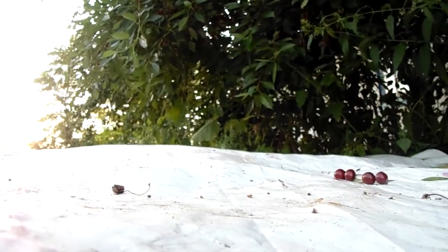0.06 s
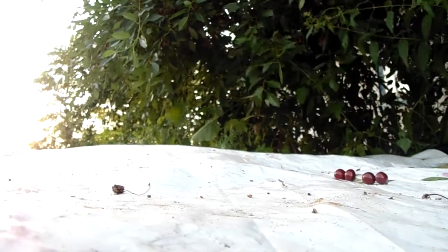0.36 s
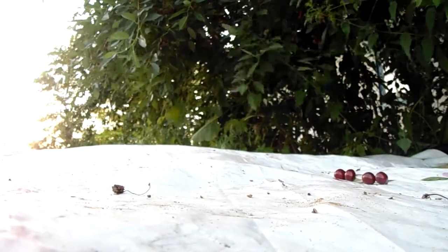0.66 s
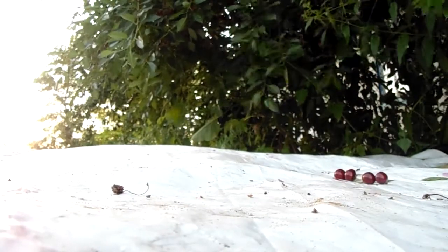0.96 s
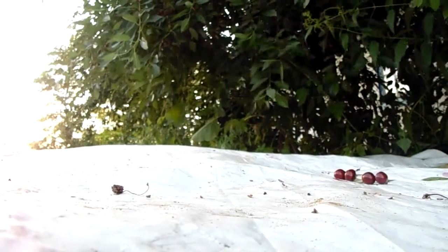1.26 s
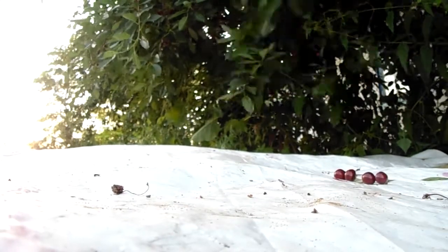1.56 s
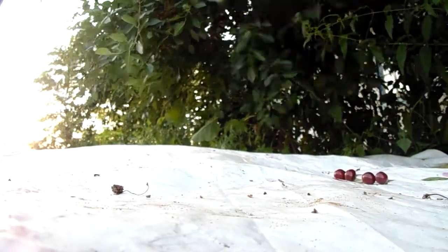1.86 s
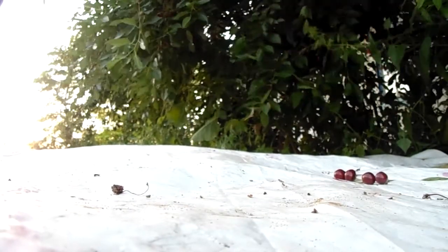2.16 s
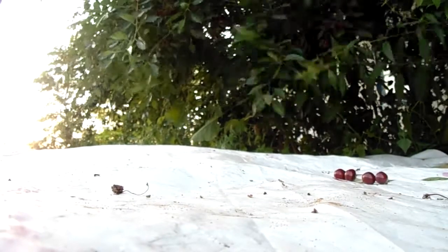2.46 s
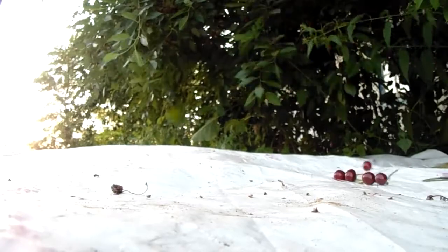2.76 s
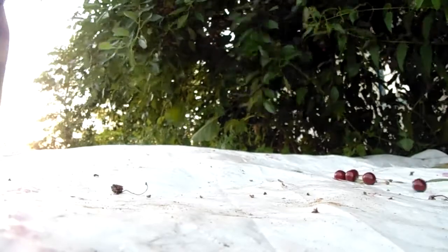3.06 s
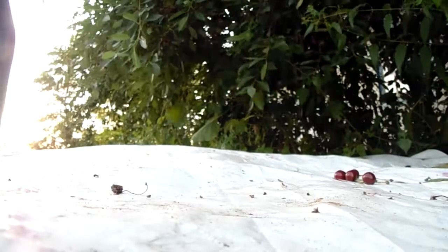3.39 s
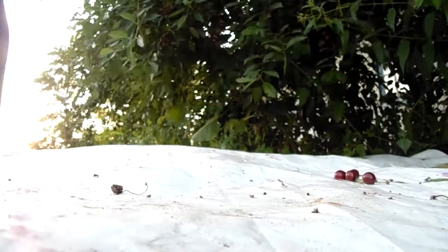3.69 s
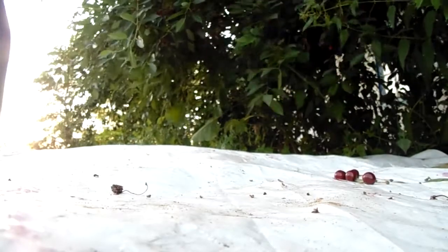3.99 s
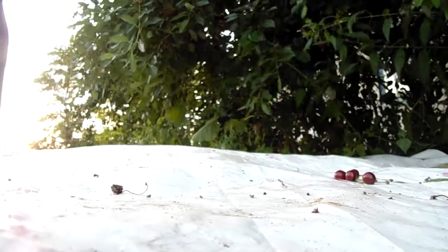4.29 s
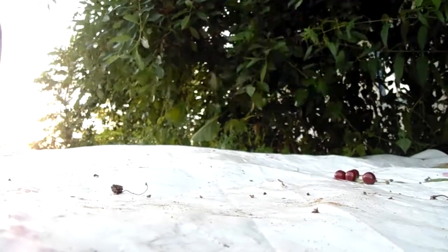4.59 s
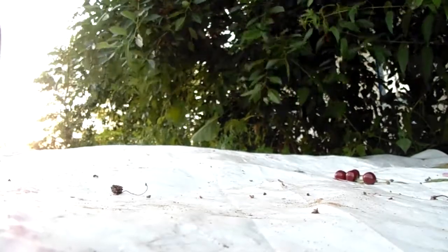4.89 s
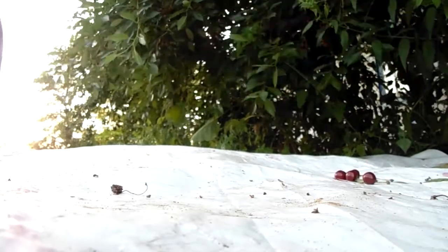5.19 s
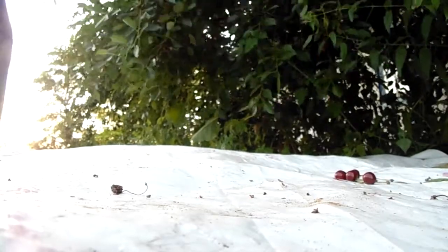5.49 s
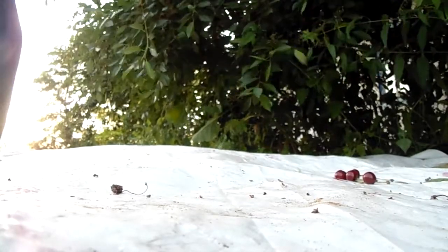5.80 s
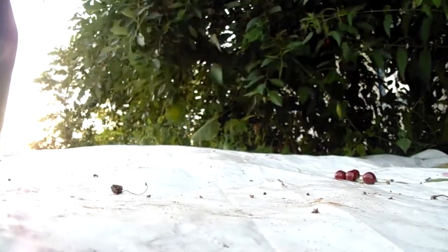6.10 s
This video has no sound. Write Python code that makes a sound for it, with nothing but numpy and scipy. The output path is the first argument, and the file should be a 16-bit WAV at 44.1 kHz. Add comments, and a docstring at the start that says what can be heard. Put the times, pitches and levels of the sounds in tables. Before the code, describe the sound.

A rake pulls through a cherry tree right from the start, with a strong leafy swish and sharp stalk snaps at about 0.2 seconds. More strokes follow near 0.8 seconds and from 1.4 to 2.9, the leaves crackling and the tines scraping the branch. From 0.9 seconds cherries fall close by, singly and in quick clusters, each slapping a plastic sheet and thudding on the ground beneath; the loudest lands at about 1 second. The rustling eases after 3 seconds while fruit keeps dropping, then returns in a busy run of strokes from 3.8 to about 6 seconds, with more snaps and scattered landings. Far behind, over quiet outdoor air, a small engine faintly revs up and down. Near 4.2 seconds it bogs to a lower, louder drone, then pulls back up to speed by about 5.5 seconds.

```python
"""From the start a rake is pulled through a cherry tree in repeated strokes: leaves swish and crackle,
tines scrape the branch and stalks snap, while far off a small engine revs up and down over quiet
outdoor air. From 0.9 s cherries drop close by, each slapping a plastic sheet and thudding on the
ground beneath. Near 4.2 s the engine bogs down under load and grows louder, then pulls up to speed
as the raking and the falling fruit go on."""
import sys
import numpy as np
from scipy import signal
from scipy.fft import rfft, irfft, next_fast_len
from scipy.io import wavfile
from scipy.ndimage import uniform_filter1d, map_coordinates

SR = 44100
rng = np.random.default_rng(int(sys.argv[2]) if len(sys.argv) > 2 else 0)


def file_out(sig):
    """Save sig as 16-bit WAV at sys.argv[1]."""
    # one column per channel
    cols = np.atleast_2d(sig).T
    # limit, then scale
    lim = np.clip(cols, -1, 1)
    pcm = np.round(lim * 32767).astype(np.int16)
    wavfile.write(sys.argv[1], SR, pcm)


N = 275625
TOP_HZ = 14300  # upper band limit

# spectrum of the outdoor background: (frequency [Hz], relative level [dB])
AIR_SPECTRUM = [(20, -10), (60, -4.5), (120, 3), (200, -9), (400, -6), (700, -9), (1200, -15.5),
                (2000, -13), (4000, -22), (14000, -44)]
# reverberation of the garden: (frequency [Hz], t60 [s])
GARDEN_DECAY = [(150, 0.62), (1000, 0.15), (10000, 0.16)]
# throttle blips: (time of the top [s], firing rate [Hz])
THROTTLE_BLIPS = [(0.198, 122.3), (1.55, 127.4), (2.22, 122.6), (3.05, 123.5)]
# the engine under load: (time [s], firing rate [Hz], relative level [dB])
ENGINE_LOAD = [(4.18, 100.3, -75), (4.32, 87.8, -41), (4.85, 88.4, -40), (5.05, 100.7, -39),
               (5.33, 113, -50), (5.55, 121.5, -49), (6.25, 120.9, -51.5)]
# exhaust harmonics: (multiple of the firing rate, weight at low speed [dB], weight at high speed [dB])
EXHAUST_HARMONICS = [(1, -3.5, 0.5), (2, -14, -15), (3, -42, -4), (4, -26, -13), (5, -22, -6),
                     (6, -19.5, -6), (7, -24, -17), (8, -14.5, -15)]
# cherries landing: (time [s], relative level [dB], slap pitch [Hz], thud weight [dB],
# crumple t60 [s], smack level re crumple [dB])
CHERRY_LANDINGS = [(0.905, -14.5, 1180, -19.5, 0.036, -11), (0.9883, -1.5, 630, -37, .043, 6.5),
                   (1.057, -19, 910, -21, 0.05, -9), (1.08, -22.5, 680, -8.5, 0.071, -23),
                   (1.143, -18, 1110, -10.5, 0.082, -5), (1.747, -15.5, 527, -20, 0.038, -13),
                   (1.876, -14.5, 660, -12, 0.071, -7), (1.956, -33, 486, 6, 0.072, -14),
                   (2.037, -21.5, 2500, -21, .044, -15), (2.227, -13.5, 715, -20.5, 0.036, -28),
                   (2.395, -14, 785, -15, 0.025, -8), (2.572, -22, 510, -18, 0.13, -12),
                   (2.86, -7.5, 1380, -19.5, 0.063, -2), (3.106, -11.5, 1490, -18.5, 0.051, -27),
                   (3.164, -13.5, 1320, -15, 0.031, -8), (3.22, -14, 1990, -20.5, 0.048, -26),
                   (3.411, -37.5, 560, -4, 0.19, -25), (3.488, -18, 1030, -16, 0.034, -2.5),
                   (4.277, -15, 730, -18, .098, -11), (4.958, -10, 1260, -14.5, 0.035, -6),
                   (5.339, -19.5, 580, -28, 0.051, -12), (5.571, -14.5, 1461, -17, 0.059, -7),
                   (5.799, -10, 550, -20, 0.035, -9), (5.818, -15.5, 710, -13, 0.076, -7),
                   (5.966, -23.5, 890, -23, 0.058, -3)]
# response of the plastic sheet: (frequency [Hz], gain [dB])
SHEET_RESPONSE = [(50, -15), (150, 3.5), (330, 3), (480, 1.5), (740, 3.5), (1050, -0.5), (1500, 2),
                  (3000, -3), (5000, -9), (14000, -6.5)]
# stalks snapping, tines hitting twigs: (time [s], relative level [dB], pitch [Hz], shiver re tick [dB])
STALK_SNAPS = [(0.018, -13, 8700, -3.5), (0.111, -7, 7430, -10), (0.167, -5.5, 1800, -25),
               (0.1893, 1.5, 10200, 2), (0.191, -5, 1720, -6), (0.303, -18.5, 7200, -5),
               (0.443, -7.5, 11200, -6), (0.753, -15, 8990, -27), (0.852, -7.5, 9600, -7),
               (0.9487, -19.5, 3820, -8), (0.9677, -19, 7730, -12), (0.9892, -14.5, 6000, -11),
               (1.1615, -14, 12800, -23), (1.419, -9, 7470, -8), (1.4317, -21, 2570, -16),
               (1.5567, -15.5, 2420, -10), (1.5977, -14, 4770, -6), (2.1226, -14, 12550, -6),
               (2.2582, -12.5, 2130, -8), (2.3337, -12, 7200, -10), (2.3794, -19, 4200, -12),
               (2.5162, -16, 3470, -9), (2.6212, -21, 2450, -7), (3.8482, -8.5, 3180, -6),
               (4.346, -15, 2390, -13), (4.4757, -9, 3630, -20), (4.9824, -4, 5770, -21),
               (5.1375, -7, 4020, -19)]
# pulls of the rake: (time of full force [s], rustle level [dB], rise [s], hold [s], fall [s],
# twig weight [dB], scrape weight [dB])
RAKE_STROKES = [(0.105, -33, 0.1, 0.018, .05, -18, -27), (0.186, -21, 0.095, 0.018, .05, -9.5, -14),
                (0.35, -39, 0.15, 0.017, 0.23, -10, -30), (0.745, -41, .015, 0.016, 0.16, -6, -25),
                (0.851, -29, 0.0098, 0.0079, 0.12, -9, -32), (1.42, -25.5, 0.0023, .016, 0.036, -2.5, -6.5),
                (1.45, -31, 0.019, 0.042, 0.57, -9, -16), (1.867, -26.5, 0.016, 0.025, 0.27, -5, -17),
                (2.26, -30.5, 0.064, 0.075, 0.25, -6.5, -14), (2.655, -32.5, 0.063, 0.11, 0.27, -7, -15),
                (3.779, -34.5, 0.0026, 0.0091, .15, -5.5, -22), (3.825, -31, 0.022, 0.054, 0.055, -4, -2),
                (3.87, -24.5, 0.033, 0.032, 0.14, -8, -11.5), (4.0, -35.5, 0.19, 0.099, 0.39, -9.5, -12.5),
                (4.38, -30.5, 0.044, 0.035, 0.087, -4.5, -8), (4.469, -21, 0.13, 0.014, .11, -8, -11.5),
                (4.66, -31, .2, 0.0091, 0.16, -9, -16), (4.986, -22, 0.042, 0.057, 0.2, -9.5, -12),
                (5.18, -35.5, 0.089, .01, 0.19, -13, -14), (5.458, -28.5, 0.14, 0.14, 0.1, -8.5, -10.5),
                (5.815, -34, 0.05, 0.12, 0.055, -22, -18), (6.245, -40, 0.092, .01, 0.076, -9, -22)]
# resonance of the branch under the tines, higher for thinner ones: (time [s], frequency [Hz])
BRANCH_RESONANCE = [(0.2, 1720), (1.42, 2200), (3.85, 2730), (4.5, 3370), (5.1, 3550)]
# spectrum of brushed twigs: (frequency [Hz], relative level [dB])
TWIG_SPECTRUM = [(80, -37), (200, -3.5), (700, -3), (1000, -14), (1600, -1.5), (2400, 1.5), (3300, -1),
                 (4400, -4), (9000, -10.5)]
# spectrum of sliding leaves: (frequency [Hz], relative level [dB])
LEAF_SPECTRUM = [(100, -17), (400, -32), (1200, -5.5), (2400, -18), (3000, -9), (3500, -2), (4100, -6),
                 (4800, -4.5), (7000, -1), (10000, 0), (14000, -2)]


def amp(db):
    """Amplitude ratio of a level in decibels."""
    return 10 ** (np.asarray(db) / 20)


def unit(x):
    """Normalisation to rms 1."""
    return x / np.sqrt(np.mean(x ** 2) + 1e-20)


def peak_unit(x):
    """Normalisation of a transient: its loudest 4 ms have rms 1."""
    return x / np.sqrt(np.abs(uniform_filter1d(x ** 2, 176)).max() + 1e-20)


def along(points, hz):
    """Interpolation of (frequency [Hz], value) points on a logarithmic axis."""
    knots_hz, values = np.transpose(points)
    return np.interp(np.log(hz + 1), np.log(knots_hz + 1), values)


def curves(rows):
    """Linear interpolation in time: one value per sample for each column after the first."""
    times, *columns = np.transpose(rows)
    return [np.interp(np.arange(N) / SR, times, column) for column in columns]


def wobble(rate):
    """Smooth random modulation: a spline through `rate` Gaussian knots a second."""
    return map_coordinates(rng.standard_normal(int(N * rate / SR) + 4), [np.arange(N) * rate / SR])


def filtered(x, response):
    """Zero-phase filtering: the spectrum of x times a response of frequency."""
    size = next_fast_len(N + SR // 2)
    return irfft(rfft(x, size) * response(np.fft.rfftfreq(size, 1 / SR)), size)[..., :N]


def coloured(x, spectrum):
    """Spectral shaping of x, at rms 1."""
    return unit(filtered(x, lambda hz: amp(along(spectrum, hz))))


def struck(x, gain):
    """Causal response to x: the minimum-phase filter with this gain over frequency."""
    size = 2 * len(x)
    magnitude = np.maximum(gain(np.fft.rfftfreq(size, 1 / SR)), 1e-6)
    cepstrum = irfft(np.log(magnitude), size)
    folded = np.concatenate([cepstrum[:1], 2 * cepstrum[1:len(x)]])
    return irfft(rfft(x, size) * np.exp(rfft(folded, size)), size)[:len(x)]


def resonance(hz, centre_hz, q):
    """Gain of a damped resonator with quality factor q."""
    return 1 / np.sqrt(1 + (q * (hz / centre_hz - centre_hz / (hz + 1))) ** 2)


def add(track, time_s, x):
    """Superposition of x on the track, starting at time_s."""
    part = track[max(round(time_s * SR), 0):][:len(x)]
    part += x[:len(part)]


def crackle(count, pitch_hz, scatter, cycles, size_db):
    """Shot noise: tiny contacts ring as damped sines, a few much stronger than the rest."""
    steps = np.arange(64)
    t = steps / SR
    start = (N * rng.random((count, 1))).astype(int)
    hz = np.clip(pitch_hz * np.exp(scatter * rng.standard_normal((count, 1))), 500, TOP_HZ)
    strength = amp(size_db * np.minimum(rng.exponential(1, (count, 1)), 5))
    sign = np.sign(rng.standard_normal((count, 1)))
    grains = sign * strength * np.sqrt(hz) * np.sin(2 * np.pi * hz * t) * np.exp(-hz * t / cycles)
    return unit(np.bincount((start + steps).ravel(), grains.ravel(), minlength=N)[:N])


def air():
    """Ambient noise: a soft, low outdoor background under slow amplitude modulation."""
    return amp(-51.0 + 2.6 * wobble(3.34)) * coloured(rng.standard_normal(N), AIR_SPECTRUM)


def garden(x):
    """Reverberation: ground and hedge scatter a short, delayed tail whose bass lasts longest."""
    hz, t, noise = signal.stft(rng.standard_normal(SR // 3), SR, nperseg=256)
    decay = amp(-60 * t / along(GARDEN_DECAY, hz)[:, None])
    tail = signal.istft(noise * decay, SR, nperseg=256)[1]
    return signal.fftconvolve(x, np.pad(tail / np.linalg.norm(tail), (300, 0)))[:N]


def throttle(idle_hz=101.2, climb_hz_per_s=70, sag_hz_per_s=29):
    """Modulation of firing rate and level: blips climb fast and sag to idle, until the load sets in."""
    t = np.arange(N) / SR
    blips = [top_hz - np.maximum(climb_hz_per_s * (top_s - t), sag_hz_per_s * (t - top_s))
             for top_s, top_hz in THROTTLE_BLIPS]
    free_hz = np.maximum(np.max(blips, axis=0), idle_hz)
    free_db = -63 + 0.4939 * (free_hz - idle_hz)  # louder with speed
    return np.where(t < ENGINE_LOAD[0][0], [free_hz, free_db], curves(ENGINE_LOAD))


def engine():
    """Periodic firing gives a distant exhaust a harmonic series whose balance shifts with speed."""
    firing_hz, level_db = throttle()
    phase = 2 * np.pi * np.cumsum(firing_hz * (1 + 0.0045 * wobble(25))) / SR
    speed = np.clip((firing_hz - firing_hz.min()) / 30, 0, 1)
    coasting_db = -9 * (np.arange(N) / SR < ENGINE_LOAD[0][0])  # overtones are softer with no load
    drone = 0
    for k, slow_db, fast_db in EXHAUST_HARMONICS:
        waver_db = 1.8 * np.sqrt(k) * wobble(11)
        db = slow_db + speed * (fast_db - slow_db) + coasting_db * (k > 1) + waver_db
        smear_rad = 0.1 * (k - 1) * wobble(45)  # moving air blurs the higher overtones
        drone = drone + amp(db) * np.sin(k * phase + smear_rad + 2 * np.pi * rng.random())
    return amp(level_db + 1.5) * drone


def cherries():
    """Impact excitation: each fruit slaps the sheet, which crumples, and thuds on the ground beneath."""
    out, t = np.zeros(N), np.arange(SR // 5) / SR
    contact = signal.unit_impulse(len(t), SR // 1000)
    for time_s, db, hz, thud_db, t60, smack_db in CHERRY_LANDINGS:
        folds = rng.standard_normal(len(t)) * amp(2.3 * rng.standard_normal(len(t)))
        settling = amp(-60 * t / t60) + amp(-24) * amp(-60 * t / (3 * t60))
        crumple = unit(folds * settling * (1 - np.exp(-t / 0.0017)))
        smack = amp(smack_db) * unit(contact)  # where the sheet lies flat, the hit is one clean smack
        slap = struck(crumple + smack, lambda f: amp(along(SHEET_RESPONSE, f)) * resonance(f, hz, q=0.9))
        push = rng.standard_normal(len(t)) * amp(-60 * t / 0.042) + 20 * contact
        thud = struck(push, lambda f: resonance(f, centre_hz=262, q=0.59) ** 2)
        landing = amp(db - 9.5) * peak_unit(slap) + amp(db + thud_db + 4) * peak_unit(thud)
        add(out, time_s + 0.00058, landing)
    return out


def small_snaps(rustle_db, count, scatter_db=8, pitch_hz=6500, shiver_db=-11):
    """A random point process: thin stalks break, scaled to the rustle; rows as in STALK_SNAPS."""
    starts = rng.integers(0, N, count)
    deviations = np.clip(rng.standard_normal((count, 2)), -2, 2)
    return [(i / SR, rustle_db[i] + 2 + scatter_db * size, pitch_hz * np.exp(0.35 * detune), shiver_db)
            for i, (size, detune) in zip(starts, deviations)]


def snaps(rustle_db):
    """Fracture transients: a stalk parts with a sharp tick and its leaves shiver briefly."""
    out, t = np.zeros(N), np.arange(SR // 10) / SR
    for time_s, db, hz, shiver_db in STALK_SNAPS + small_snaps(rustle_db, count=20):
        attack = 1 - np.exp(-t / 0.0002)
        fade = amp(-60 * t / 0.0078) + amp(shiver_db) * amp(-60 * t / 0.066)
        tearing = rng.standard_normal(len(t)) * amp(rng.standard_normal(len(t)))  # fibres part in turn
        tick = struck(attack * fade * tearing, lambda f: resonance(f, hz, q=1.2))
        add(out, time_s + 0.0005, amp(db - 13) * peak_unit(tick))
    return out


def scraping(half_width_hz=530):
    """Stick-slip friction: tines catch on the bark and drive the resonance of the branch; rms 1."""
    branch_hz, = curves(BRANCH_RESONANCE)
    slips = rng.standard_normal(N) * amp(5.2 * rng.standard_normal(N))
    carrier = np.exp(2j * np.pi * np.cumsum(branch_hz) / SR)
    baseband = signal.lfilter(*signal.butter(2, half_width_hz, fs=SR), slips / carrier)
    return unit(np.real(baseband * carrier))


def raking(swing_db=20, typical_pull_s=0.28, sway_db_per_s=23.5):
    """Incoherent sources add in power: pulls and the sway after them set leaf, twig and scrape dB."""
    t = np.arange(0, N / SR, 0.001)
    leaf, twig, scrape = amp(-53) ** 2, amp(-66) ** 2, 0  # the tree between strokes
    for time_s, db, rise, hold, fall, twig_db, scrape_db in RAKE_STROKES:
        early, late = np.maximum(time_s - t, 0), np.maximum(t - time_s - hold, 0)
        pull = amp(db - swing_db * (early / rise + late / fall)) ** 2
        reach = (rise + hold + fall) / typical_pull_s  # longer pulls set the branch swaying more
        sway = (reach * amp(db - 12.5 - swing_db * early / rise - sway_db_per_s * late)) ** 2
        leaf = leaf + pull + sway
        twig = twig + pull * amp(twig_db) ** 2 + sway * amp(-7) ** 2
        scrape = scrape + pull * amp(scrape_db) ** 2
    levels_db = 10 * np.log10(np.array([leaf, twig, scrape]) + 1e-20)
    return curves(np.transpose([t, *levels_db]))


def foliage(rustle_db, twig_db, scrape_db, treble_hz=9000):
    """Friction noise: leaves slide and spring free, twigs brush the tines, tines scrape the branch."""
    catch_db = 1.28 * wobble(70)  # the tines catch and let go
    hiss = rng.standard_normal(N)
    contacts = crackle(count=14000, pitch_hz=7180, scatter=0.51, cycles=0.88, size_db=2.0)
    flicks = crackle(count=320, pitch_hz=7870, scatter=0.44, cycles=3.5, size_db=3.0)  # stiff leaves
    leaves = coloured(hiss + 0.66 * contacts + 0.22 * flicks, LEAF_SPECTRUM)
    treble = filtered(leaves, lambda hz: hz ** 4 / (hz ** 4 + treble_hz ** 4))
    leaves = leaves + treble * (amp(0.23 * (rustle_db + 30)) - 1)  # faster leaves are brighter
    brushing = rng.standard_normal(N)
    clicks = crackle(count=2500, pitch_hz=2635, scatter=0.5, cycles=2.1, size_db=4.5)
    twigs = amp(twig_db + 1.5 * wobble(40)) * coloured(brushing + 0.32 * clicks, TWIG_SPECTRUM)
    return amp(catch_db) * (amp(rustle_db + 0.5) * leaves + twigs + amp(scrape_db) * scraping())


def scene():
    """Superposition in mono: tree and falling fruit in front, engine and air behind."""
    rustle_db, twig_db, scrape_db = raking()
    hits = cherries() + snaps(rustle_db)
    mix = foliage(rustle_db, twig_db, scrape_db) + hits + amp(-14.5) * garden(hits) + engine() + air()
    return mix[None, :]


def record(dry):
    """Band limiting: an ideal low-pass filter removes everything above TOP_HZ."""
    return filtered(dry, lambda hz: hz < TOP_HZ)


dry = scene()
out = record(dry)
file_out(out)
```